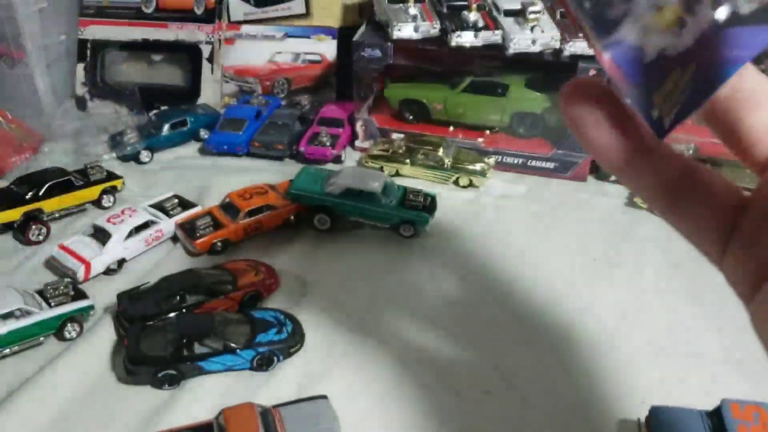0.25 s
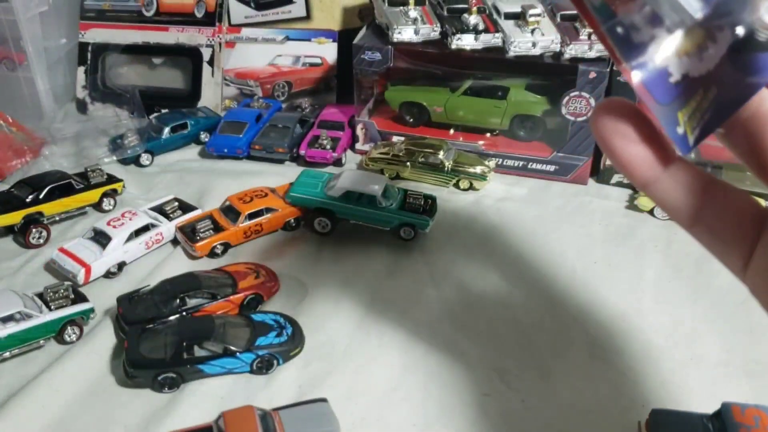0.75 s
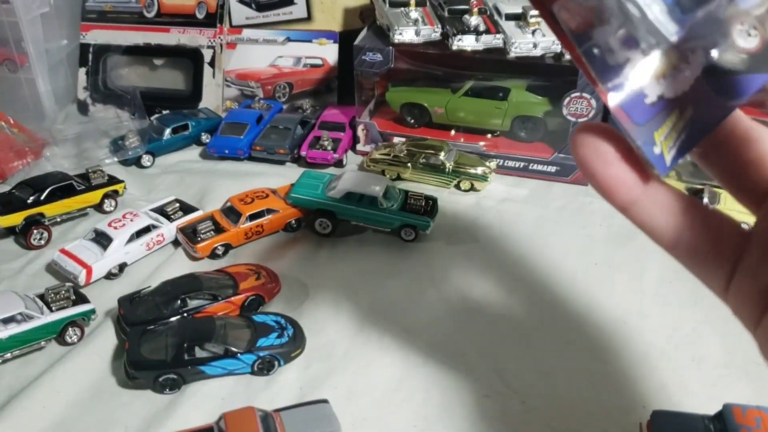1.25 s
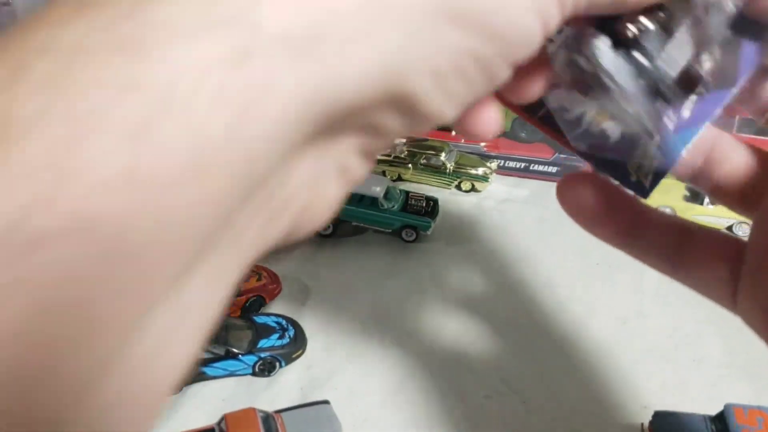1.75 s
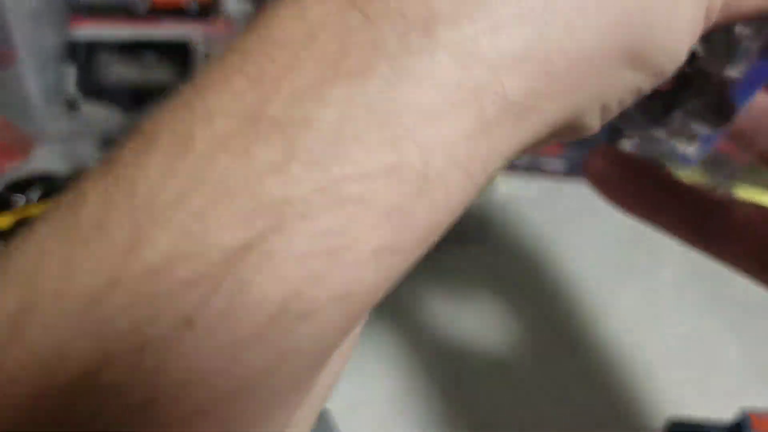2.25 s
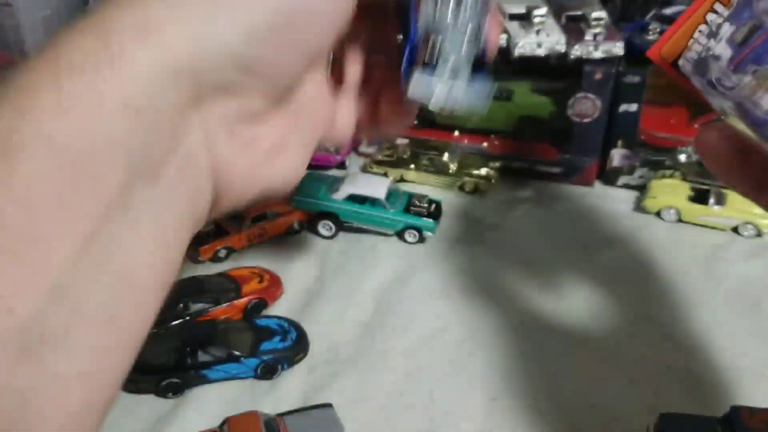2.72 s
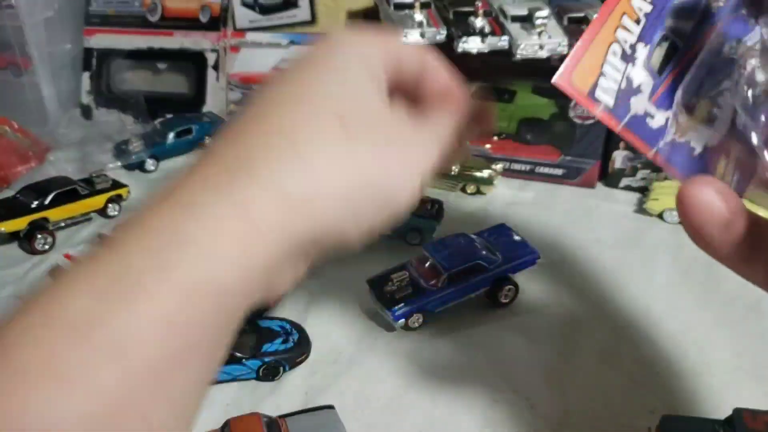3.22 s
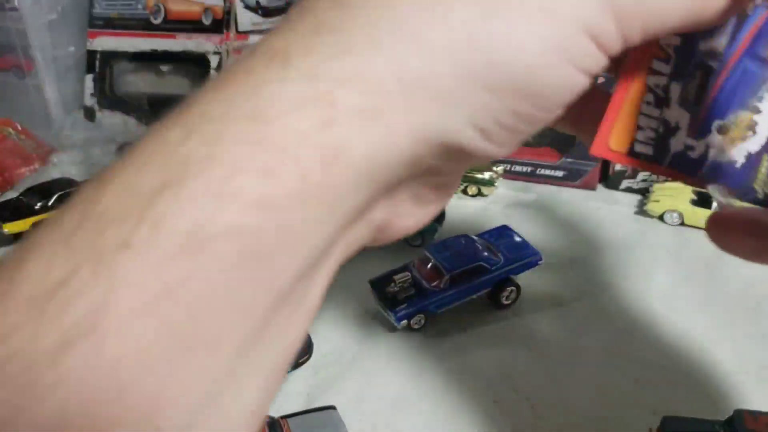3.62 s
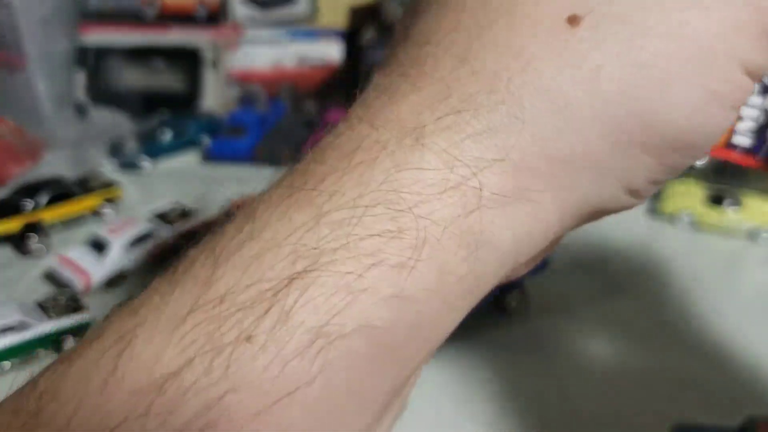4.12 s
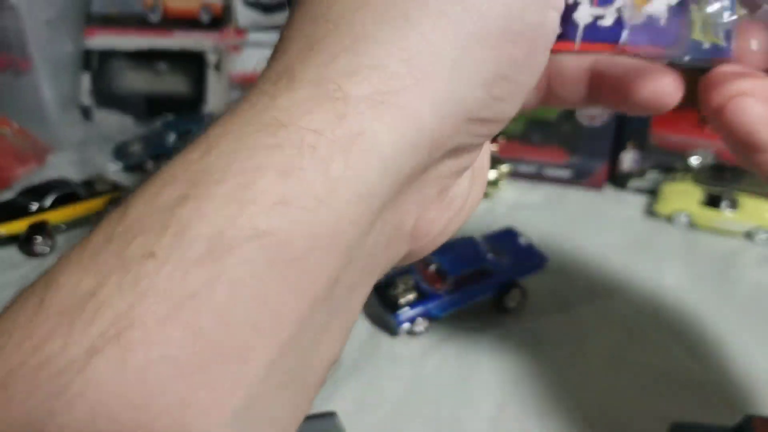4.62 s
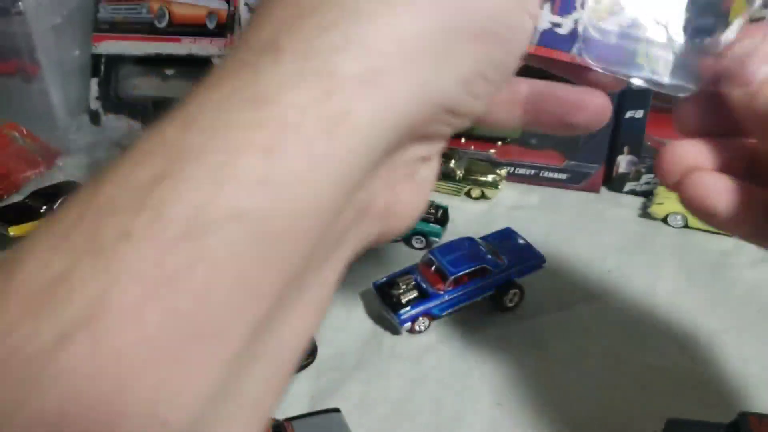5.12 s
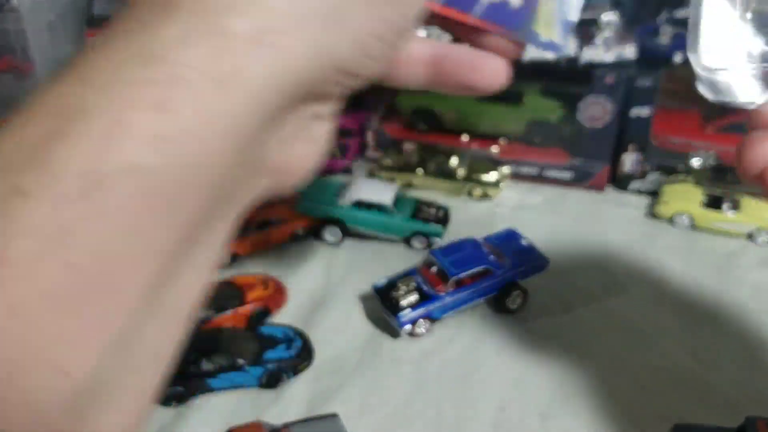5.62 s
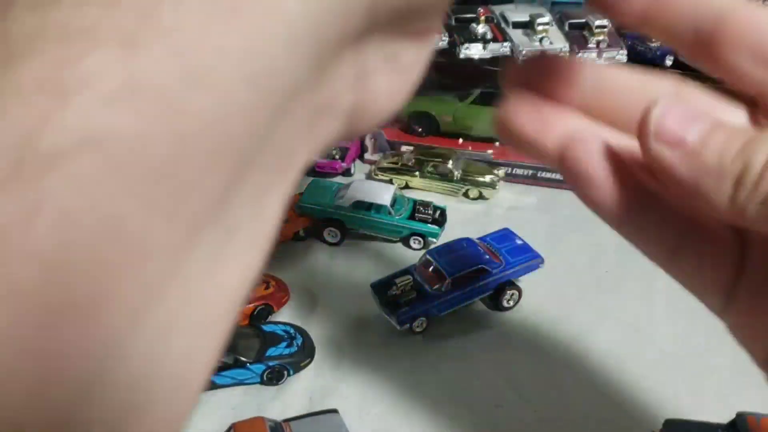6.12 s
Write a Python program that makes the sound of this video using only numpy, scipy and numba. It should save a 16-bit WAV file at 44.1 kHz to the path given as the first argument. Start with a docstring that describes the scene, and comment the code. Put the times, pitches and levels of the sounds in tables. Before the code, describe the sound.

Hands bend and tear a stiff plastic blister pack from its card, close to the microphone in a small quiet room. A sharp snap and a few hollow pops lead into a dense run of crackling. Midway a small toy bumps dully on a cloth-covered table. Fingers and card rub and scrape between further snaps, and a louder cluster of crackles comes near the end before the handling dies down.

```python
"""A stiff plastic blister pack and its card, bent and torn by hand close to a phone's two microphones.
Small quiet room. The shell buckles in sharp snaps that ring the plastic and boom in the card; fingers
and card rub and scrape between them, with one early slide over the hollow shell and three faint squeaks.
A toy and the arms bump a cloth-covered table. The pack sits left of centre, over a low room hush."""
import sys
import numpy as np
from scipy import signal
from scipy.fft import rfft, irfft
from scipy.io import wavfile
from scipy.ndimage import uniform_filter1d, map_coordinates
from numba import njit

SR = 44100
rng = np.random.default_rng(int(sys.argv[2]) if len(sys.argv) > 2 else 0)


def master_out(mix):
    """Clip the mix to full scale and print it as 16-bit PCM to the path in sys.argv[1]."""
    frames = np.transpose(np.atleast_2d(mix))
    ceiling = np.clip(frames, -1, 1)
    pcm = np.round(ceiling * 32767).astype(np.int16)
    wavfile.write(sys.argv[1], SR, pcm)


N = 280694
T = np.arange(N) / SR

# Steady rub of skin and card: time_s, shell_db, card_db, crackle_db
RUB_LEVELS = [(0, -45.5, -58, -66), (.28, -71, -70.5, -80), (.96, -75, -96, -83), (1.2, -64, -89, -71),
              (1.66, -72.5, -92, -85.5), (1.91, -52, -82, -68), (2.11, -65.5, -64, -68),
              (2.34, -55, -80, -64.5), (2.66, -68, -95, -77), (3.0, -69, -95, -76), (3.45, -65, -80, -73),
              (3.81, -57.5, -67.5, -67), (4.07, -63, -66, -73), (4.25, -67.5, -75.5, -79),
              (4.53, -59.5, -78, -61.5), (4.82, -58.5, -57.5, -68), (5.19, -65.5, -71, -80),
              (5.47, -60.5, -65.5, -66), (5.7, -66.5, -91, -73), (6.36, -74, -87, -85.5)]
# Harder scrapes, and the ringing tails of a few snaps:
# peak_s, level_db, card_offset_db, fizz_offset_db, swell_30db_s, fade_30db_s
SCRAPES_AND_TAILS = [(.01, -43, -2, 2, .067, .037), (.14, -43.5, -21, -5, .15, .032),
                     (1.133, -43.5, 9.5, -13, .008, .08), (1.219, -42.5, 4.5, -16, .11, .079),
                     (1.732, -49, -22.5, 3.5, .016, .15), (2.241, -44, -17, -21, .087, .067),
                     (2.959, -54, -35, -2, .008, .037), (3.03, -53, -33, 4, .017, .03),
                     (3.09, -62.5, -1, -6, .054, .061), (3.623, -40.5, -15.5, -6, .045, .022),
                     (3.789, -50.5, -10.5, -1, .16, .034), (4.405, -44, -18, -8, .053, .093),
                     (4.709, -48.5, -9, -5, .08, .07), (4.79, -45, -22, -6, .08, .091),
                     (4.9, -46, -11, -26, .028, .088), (4.953, -42.5, -16, -12, .054, .042),
                     (5.025, -28.5, -15.5, -13, .038, .034), (5.21, -33, -16, -10, .012, .029),
                     (5.248, -42.5, -8, -12, .018, .033), (5.371, -39.5, -7, -4.5, .074, .035),
                     (5.457, -37, -16, -9, .02, .025), (5.525, -47, -21, -16, .014, .07),
                     (5.579, -44.5, 1, -12, .075, .042), (5.654, -42, -6.5, -11, .07, .056),
                     (6.001, -58.5, -11.5, -6, .084, .11), (6.149, -48.5, -9.5, -3, .055, .18)]
# The pack's four bands, from card boom up to fizz: centre_hz, width_hz, gain_db
CARD_MODES = [(355.4, 87, 4), (605, 320, -10.5), (732, 316, -1.5)]
SHELL_MODES = [(963, 317, -1), (1510, 810, 2.5), (1760, 630, 7.5), (2705, 1050, -5), (3632, 1050, -0.5)]
CRACKLE_MODES = [(4024, 900, -4.5), (5130, 1230, 1.5), (6640, 2080, -2)]
FIZZ_MODES = [(10110, 3100, -13), (12240, 2500, -5), (15700, 2500, 1)]
# Where the pack is held, as a delay between the microphones: time_s, right_lag_samples
PACK_LAG = [(0, -5), (.5, -5), (.6, 19), (1.4, 19), (1.6, -4), (6.36, -4)]
# Bumps on the table: time_s, level_db, upper_modes_offset_db
BUMPS = [(.002, -45, -2.5), (.399, -52, -1.5), (.453, -50, -6.5), (1.16, -37.5, 2.5), (1.21, -41.5, -2.5),
         (1.319, -52.5, .5), (1.742, -42, -40), (2.053, -53.5, -12), (2.143, -47, -34), (3.029, -31, -18),
         (3.164, -23.5, -5.5), (3.213, -29, -7), (3.383, -52, -37), (3.608, -49.5, -13), (3.835, -54, -2),
         (4.424, -57, -1), (4.597, -63, 3), (4.722, -53, -9.5), (5.002, -61, 2.5), (5.227, -65, 10),
         (5.336, -48, 3.5), (5.552, -48, .5), (5.626, -40, -4.5), (6.183, -55, -6.5)]
# Lower and upper modes of the table top: pitch_hz, gain_db, t60_s
TABLE_LOW_MODES = [(61, 0, 0.36), (97, 4, 0.25), (121, 1.5, 0.1)]
TABLE_HIGH_MODES = [(174, 10, 0.066), (196, 0.5, .08), (227.5, 10, .07), (270, -14.5, 0.028)]
# Colour of the room tone: frequency_hz, relative_db
HUSH_SPECTRUM = [(18, -41.5), (30, -24.5), (43, -3.5), (65, 2), (86, -10), (125, -3.5), (146, -8.5),
                 (694, -33.5), (1380, -22.5), (2220, -44), (2890, -21), (4410, -33.5), (6550, -46),
                 (14800, -32.5), (16500, -51.5)]
# Its balance across the microphones: frequency_hz, left_minus_right_db
HUSH_PAN = [(60, 7), (110, 8.5), (200, -4), (380, 10), (700, 12.5), (1290, 24), (2380, 19), (4400, -14),
            (8120, -3.5), (15000, -8)]
# Card sliding along the hollow shell: time_s, cavity_hz, level_db
SLIDE_PATH = [(.08, 1150, -75), (.135, 1450, -51), (.18, 1800, -62), (.3, 1650, -65), (.38, 1400, -66),
              (.45, 1350, -95)]
# Thin squeaks of skin on plastic: peak_s, pitch_hz, level_db, swell_60db_s, fade_60db_s
SQUEAKS = [(.545, 4400, -65, .08, .1), (3.37, 3800, -62, .04, .06), (6.22, 4300, -64, .3, .4)]
# Buckles of the shell: time_s, level_db, dent_hz, card_offset_db, fizz_offset_db, t60_s
SNAPS = [(.179, -41, 1750, -12, -20, .026), (.205, -51, 1750, -24, -3, .035),
         (.28, -47, 1340, -20, -22, .025), (.369, -49.5, 1460, -5, -27, .024),
         (.498, -50.5, 1430, -7, -28, .036), (.577, -50.5, 1100, -20, -26, .026),
         (.666, -13.5, 1050, -23.5, -8.5, .034), (.942, -50, 2750, -34, -12, .02),
         (1.08, -54, 3540, 0, -2, .012), (1.121, -27, 1050, -4, -27, .047),
         (1.163, -25, 1120, 12, -27, .038), (1.242, -47.5, 991, -2, 4, .04),
         (1.27, -41.5, 1890, -30, 18, .024), (1.318, -42.5, 1280, 4, -30, .054),
         (1.423, -42.5, 1950, -52, 4, .027), (1.651, -47, 2820, -34, -24, .03),
         (1.675, -50.5, 1990, -28, -12, .028), (1.712, -42.5, 1880, -38, 4, .042),
         (1.718, -35.5, 2920, -22, 12, .033), (1.721, -27, 3750, -38, 1, .03),
         (1.745, -41, 1300, -15, 14, .023), (1.762, -42.5, 2000, -19, -5, .033),
         (1.778, -45, 3120, -22, 11, .03), (1.809, -41, 2020, -21, -20, .034),
         (1.822, -34.5, 1740, -14, -17, .024), (1.868, -37.5, 1910, -14, -14, .035),
         (1.885, -35.5, 2400, -19, -15, .039), (1.912, -27.5, 1690, -14, -22, .028),
         (1.928, -28.5, 1870, -20, -3.5, .018), (1.977, -21, 1560, -27, -21, .028),
         (1.999, -27, 1310, -27, -36, .022), (2.052, -31, 1670, -34, -19, .021),
         (2.063, -41, 2490, -18, -6, .026), (2.103, -41, 3470, -20, -20, .03),
         (2.119, -30, 1900, -21, -24, .026), (2.141, -27, 2280, -22, -9, .022),
         (2.149, -30.5, 1860, -41, -17, .034), (2.155, -33.5, 2860, -41, -16, .034),
         (2.203, -39, 2320, -10.5, -24, .039), (2.272, -41, 1680, -7.5, 1, .028),
         (2.285, -39, 2370, -41, -9, .028), (2.292, -43, 2430, -24, 3, .027),
         (2.352, -21, 1840, -49.5, -16, .029), (2.387, -41.5, 2320, -37, 12, .03),
         (2.42, -35.5, 2930, -48.5, -2, .027), (2.449, -46, 2500, -26, -1, .034),
         (2.519, -39, 1750, -49, -3, .033), (2.53, -44.5, 3700, -44, 7, .025),
         (2.54, -36, 2950, -40, 3, .035), (2.548, -43.5, 1680, -32, -4, .074),
         (2.558, -36.5, 3030, -41, -29, .065), (2.572, -35, 1240, -33, -28, .044),
         (2.948, -40, 2860, -39, -12, .072), (3.167, -22, 3730, -21, -21, .055),
         (3.182, -30.5, 3760, -3, -17, .055), (3.208, -29, 1190, -6.5, -19, .041),
         (3.227, -37.5, 1980, -14, -8, .07), (3.246, -46, 1890, -21, -5, .026),
         (3.313, -39.5, 1920, -22.5, -6, .02), (3.54, -44, 2460, -20, -3, .023),
         (3.558, -40, 2770, -19.5, 5, .03), (3.568, -39.5, 1410, -15.5, -18, .041),
         (3.619, -28.5, 1130, -9.5, -8.5, .021), (3.675, -37, 1630, -20, -10, .036),
         (3.742, -44.5, 1060, -9, -7, .023), (3.798, -33.5, 1290, -15, 9, .018),
         (3.837, -38, 1090, -7, -17, .035), (3.844, -36, 1020, -8, -23, .026),
         (3.862, -37, 1030, 2, -30, .03), (3.901, -41.5, 1030, -3, -30, .025),
         (3.911, -48.5, 934, 7.5, -30, .039), (3.925, -43, 1030, 1, -29, .022),
         (3.943, -43, 1080, 7, -29, .013), (3.965, -52, 1050, 8, -27, .022),
         (4.182, -30.5, 1400, -9.5, -15, .026), (4.419, -24.5, 1670, -14.5, -11, .031),
         (4.59, -29.5, 2400, -20.5, -18, .028), (4.612, -32.5, 1050, 0, -35, .03),
         (4.751, -30, 1510, -20, -10, .032), (4.911, -34.5, 1880, -17, -28, .03),
         (4.941, -33, 1610, -9, -16, .027), (5.192, -37.5, 2660, -7.5, -21, .026),
         (5.198, -29, 1100, -10, -18, .048), (5.241, -28, 1010, -8, -23, .056),
         (5.309, -20, 1970, -3.5, -17, .045), (5.336, -19, 1640, 1.5, -17, .038),
         (5.393, -44, 2180, -14, -9, .03), (5.406, -38, 2190, -10, -19, .03),
         (5.419, -40, 2180, -15, -11, .026), (5.514, -36, 1530, -4.5, -24, .032),
         (5.538, -30.5, 2000, -1, -22, .023), (5.554, -31.5, 980, -4, -23, .047),
         (5.568, -31.5, 2060, -17, -13, .027), (5.634, -16, 1230, -12, -18, .028),
         (5.876, -53.5, 1770, -30, -9, .038), (6.009, -39.5, 1540, -10.5, -14, .033)]

CRACKLE_PER_FIZZ = .6  # crackle lies between shell ring and fizz, and follows the fizz in part


def undb(db):
    """Decibels to amplitude."""
    return 10 ** (np.asarray(db) / 20)


def unit(x):
    """Scale to an RMS of 1."""
    return x / np.sqrt(np.mean(x ** 2))


@njit
def bandpass(x, hz, width_hz):
    """State-variable band-pass, gain 1 at a centre that may move."""
    y, band, low = np.empty(len(x)), 0., 0.
    for i in range(len(x)):
        g, damping = np.tan(np.pi * hz[i] / SR), width_hz / hz[i]
        v = (band + g * (x[i] + 1e-18 - low)) / (1 + g * (g + damping))
        band, low, y[i] = 2 * v - band, low + 2 * g * v, damping * v
    return y


def steep_band(x, hz, width_hz):
    """Two equal band-passes in series."""
    return bandpass(bandpass(x, hz, width_hz), hz, width_hz)


def ring(x, modes, bend):
    """Resonances side by side in alternating polarity, scaled to keep white noise near its level."""
    parts = [undb(db) * steep_band(x, hz * bend, 1.57 * width) for hz, width, db in modes]
    power = sum(undb(2 * db) * 2.06 * width * np.pi / 2 / SR for _, width, db in modes)
    return sum((-1) ** k * part for k, part in enumerate(parts)) / np.sqrt(power)


def grit(spread_db):
    """Noise of tiny slips whose levels spread exponentially, up to a largest slip."""
    return unit(rng.standard_normal(N) * undb(spread_db * np.minimum(rng.exponential(size=N), 6.)))


def wander(rate_hz):
    """Random steps, smoothed twice."""
    hold = int(SR / rate_hz)
    steps = np.repeat(rng.standard_normal(N // hold + 1), hold)
    return 1.22 * uniform_filter1d(uniform_filter1d(steps, hold), hold)[:N]


def bursts(peak_s, level_db, swell_s, fade_s):
    """Envelope of events that swell by 60 dB to their peak and fade as much after it."""
    env = np.zeros(N)
    events = np.broadcast(peak_s, undb(level_db), np.clip(swell_s, 1e-4, .5), np.clip(fade_s, .003, .5))
    for at, size, up, down in events:
        i = np.arange(max(int((at - up) * SR), 0), min(int((at + down) * SR), N))
        env[i] += size * undb(60 * np.minimum((T[i] - at) / up, (at - T[i]) / down))
    return env


def pack_lag():
    """Samples by which the pack reaches the right microphone after the left."""
    return np.interp(T, *np.transpose(PACK_LAG))


def pack_pan(amount):
    """Left and right gains; the left grows as the pack moves towards that microphone."""
    pan_db = amount * (6 + .2 * pack_lag())
    return undb(np.array([pan_db, -pan_db]) / 2)


def at_mics(env, slips, modes, pan, shared):
    """Both microphones hear the same slips in part; the rest reaches each from another face of the pack."""
    bend = 1 + np.clip(.025 * wander(12), -.07, .07)  # bending the pack shifts its resonances
    own = slips * np.sign(rng.standard_normal((2, N)))
    drive = pack_pan(pan) * env * (np.sqrt(shared) * slips + np.sqrt(1 - shared) * own)
    return np.array([ring(side, modes, bend) for side in drive])


def rubbing():
    """Skin and card drag over the plastic in uneven slips, with scrapes and a few snaps' ringing tails."""
    time_s, shell_db, card_db, crackle_db = np.transpose(RUB_LEVELS)
    peak_s, burst_db, card_offset, fizz_offset, swell_s, fade_s = np.transpose(SCRAPES_AND_TAILS)
    crackle_offset = CRACKLE_PER_FIZZ * fizz_offset - 4.5
    slips = grit(2.35) * undb(2.5 * wander(90) + 2.0 * wander(16))

    def envelope(steady_db, offset_db):
        steady = undb(np.interp(T, time_s, steady_db) - 1.5)
        return steady + bursts(peak_s, burst_db + offset_db, 2 * swell_s, 2 * fade_s)

    shell = at_mics(envelope(shell_db, 0), slips, SHELL_MODES, pan=1.29, shared=.52)
    card = at_mics(envelope(card_db, card_offset), slips, CARD_MODES, pan=.88, shared=.9)
    crackle = at_mics(envelope(crackle_db, crackle_offset), slips, CRACKLE_MODES, pan=.65, shared=.21)
    fizz = at_mics(envelope(crackle_db + 1.5, fizz_offset), slips, FIZZ_MODES, pan=.41, shared=.5)
    return shell + card + crackle + fizz


def table_bumps(shared=.79, pan_db=4.):
    """Soft pushes of toy and arms through the cloth ring the low modes of the table top."""
    time_s, level_db, upper_offset = np.transpose(BUMPS)
    push = np.sqrt(shared) * rng.standard_normal(N) + np.sqrt(1 - shared) * rng.standard_normal((2, N))
    out = np.zeros((2, N))
    for modes, offset_db in ((TABLE_LOW_MODES, -33), (TABLE_HIGH_MODES, upper_offset - 28)):
        force = bursts(time_s + .0055, level_db + offset_db, swell_s=.016, fade_s=.11) * push
        for hz, gain_db, t60_s in modes:
            pole = np.exp(2j * np.pi * hz / SR - np.log(1000) / (t60_s * SR))
            out += undb(gain_db) * signal.lfilter([1], [1, -pole], force).imag
    # a small top radiates little below its lowest mode
    out = signal.sosfilt(signal.butter(3, 48., "high", fs=SR, output="sos"), out)
    return out * undb([[pan_db / 2], [-pan_db / 2]])


def room_tone(level_db=-71, shared_below_hz=350):
    """Room hush and microphone hiss, drifting gently in level; only the bass is common to both sides."""
    hz = np.fft.rfftfreq(N, 1 / SR) + 1
    curves = np.transpose(HUSH_SPECTRUM), np.transpose(HUSH_PAN)
    colour_db, pan_db = (np.interp(np.log(hz), np.log(knots_hz), db) for knots_hz, db in curves)
    apart = np.clip(hz / shared_below_hz, 0, 1)
    both, own = rfft(rng.standard_normal(N)), rfft(rng.standard_normal((2, N)))
    noise = np.sqrt(1 - apart) * both + np.sqrt(apart) * own
    hush = irfft(undb(colour_db + np.array([pan_db, -pan_db]) / 2) * noise, N)
    hush /= np.sqrt(np.mean(hush.mean(axis=0) ** 2))
    return undb(level_db) * hush * undb(1.6 * wander(1.6))


def slide_and_squeaks():
    """Friction rings the air gap between card and shell, and its overtone; skin squeaks now and then."""
    time_s, *columns = np.transpose(SLIDE_PATH)
    cavity_hz, level_db = (np.interp(T, time_s, column) for column in columns)
    slips = grit(2.5) * undb(3. * wander(70))
    cavity = unit(steep_band(slips, cavity_hz, width_hz=350.))
    overtone = unit(steep_band(slips, 2.1 * cavity_hz, width_hz=700.))
    out = undb(np.where(T < time_s[0], -120, level_db)) * (cavity + undb(-7) * overtone)
    for peak_s, pitch_hz, squeak_db, swell_s, fade_s in SQUEAKS:
        squeak = unit(steep_band(slips, pitch_hz * np.ones(N), width_hz=300.))
        out += bursts(peak_s, squeak_db, swell_s, fade_s) * squeak
    return pack_pan(1.2) * out


def small_snaps(count, card_offset_db=-20, t60_s=.025):
    """Chance buckles, a little louder than the rubbing that sets them off; SNAPS columns less dent_hz."""
    when, size, tint = rng.random((count, 3)).T
    time_s = when * N / SR
    rub_db = np.interp(time_s, *np.transpose(RUB_LEVELS)[:2])
    level_db = rub_db + 4 - 3 * np.log(size + 1e-3)
    fizz_offset = -16 + 12. * (tint - .5)
    return np.array(np.broadcast_arrays(time_s, level_db, card_offset_db, fizz_offset, t60_s))


def snaps(swell_s=.0024):
    """Each buckle is a brief burst of slips; it rings shell and card, and a dent sings at its own pitch."""
    listed_s, listed_db, listed_hz, *colour = np.transpose(SNAPS)
    buckles = np.hstack([[listed_s, listed_db, *colour], small_snaps(count=60)])
    time_s, level_db, card_offset, fizz_offset, t60_s = buckles
    crackle_offset = CRACKLE_PER_FIZZ * fizz_offset - 7.5
    peak_s = time_s + .00038
    slips = grit(1.95)

    def envelope(offset_db, fade_ratio):
        return bursts(peak_s, level_db + offset_db, swell_s, fade_ratio * t60_s)

    # the dent holds its pitch until the next listed snap
    dent_hz = listed_hz[np.clip(np.searchsorted(listed_s, T) - 1, 0, None)]
    shell_env = envelope(0, 1)
    dent = np.array([bandpass(side * slips, dent_hz, 193.) for side in pack_pan(1.08) * shell_env])
    shell = at_mics(shell_env, slips, SHELL_MODES, pan=1.08, shared=.44)
    card = at_mics(envelope(card_offset, 1.09), slips, CARD_MODES, pan=.73, shared=.97)
    crackle = at_mics(envelope(crackle_offset, .84), slips, CRACKLE_MODES, pan=.49, shared=.25)
    # the first break is one sharp tick at the very peak
    tick = .8 + bursts(peak_s, 3., swell_s=.0003, fade_s=.003)
    fizz = at_mics(tick * envelope(fizz_offset, .6), slips, FIZZ_MODES, pan=.6, shared=.34)
    body = undb(-3.5) * shell + undb(10.5) * dent + undb(-2.5) * card
    return body + undb(5.5) * crackle + undb(.3) * fizz


def reflections(x, t60_s=.15, level_db=-16):
    """Nearby table, boxes and walls return a short dense tail, different at each microphone."""
    t = T[:int(.4 * SR)]
    tail = rng.standard_normal((2, len(t))) * (1 - np.exp(-t / .0017)) * undb(-60 * t / t60_s)
    tail = signal.lfilter([1], [1, -.6], tail)  # dulls the treble
    tail /= np.sqrt(np.sum(tail ** 2, axis=1, keepdims=True))
    return undb(level_db) * signal.fftconvolve(x, tail, axes=1)[:, :N]


def scene():
    """The pack close up, delayed between the microphones, with its reflections, table and room tone."""
    pack = snaps() + rubbing() + slide_and_squeaks()
    pack[1] = map_coordinates(pack[1], [np.arange(N) - pack_lag()], order=3)
    return pack + reflections(pack) + table_bumps() + room_tone()


def record(dry):
    """The cavity of each microphone port puts a dip in the treble; the phone cuts the top."""
    dip_hz, dip_width_hz, dip_depth, top_hz = 8390, 1070, .52, 16050
    dip = np.array([bandpass(side, dip_hz * np.ones(N), dip_width_hz) for side in dry])
    return signal.sosfilt(signal.ellip(10, .2, 70, top_hz, fs=SR, output="sos"), dry - dip_depth * dip)


dry = scene()
out = record(dry)
master_out(out)
```